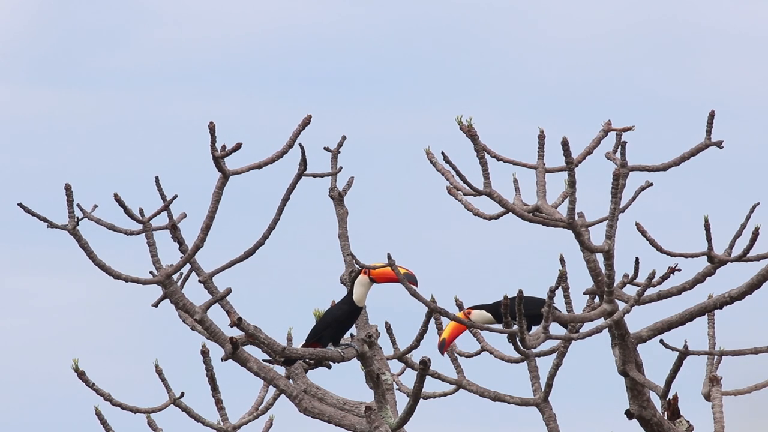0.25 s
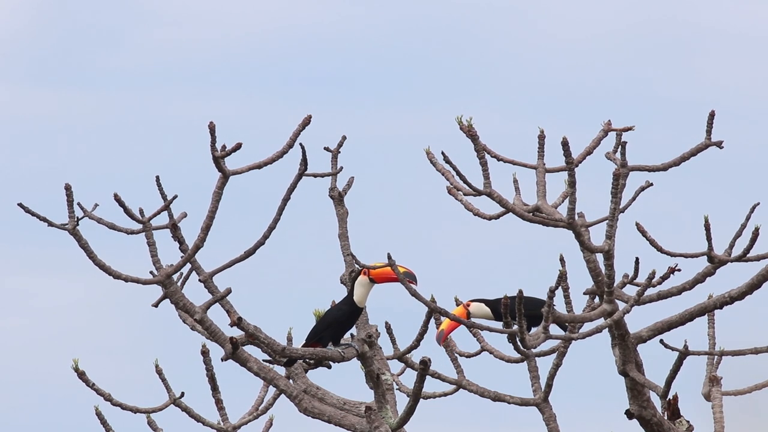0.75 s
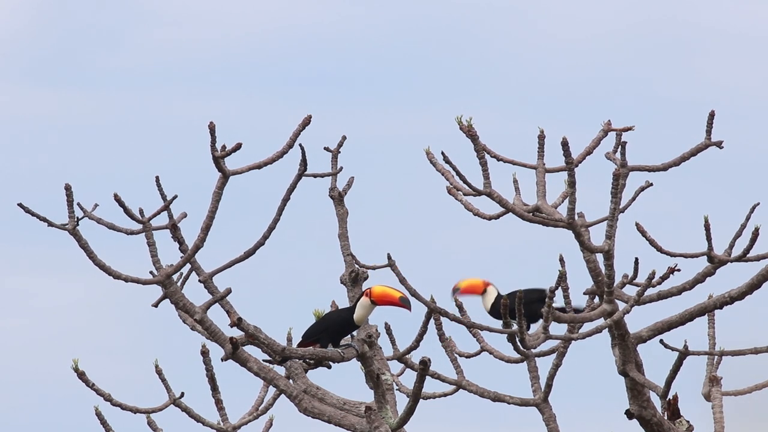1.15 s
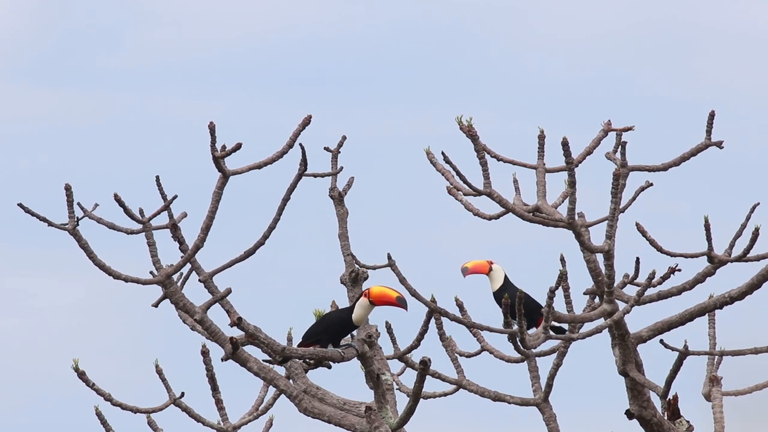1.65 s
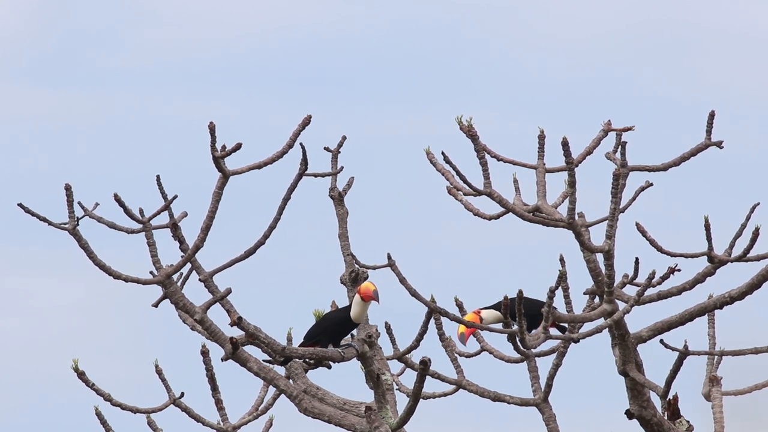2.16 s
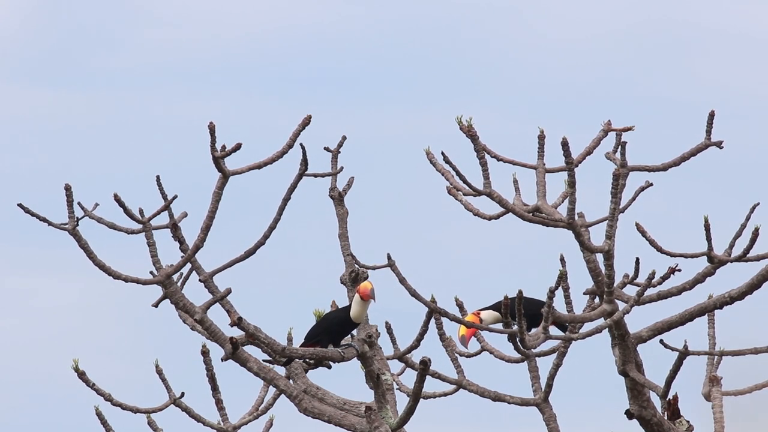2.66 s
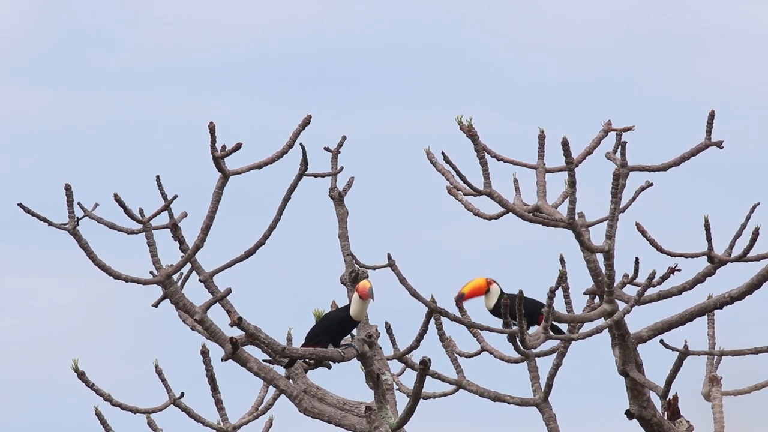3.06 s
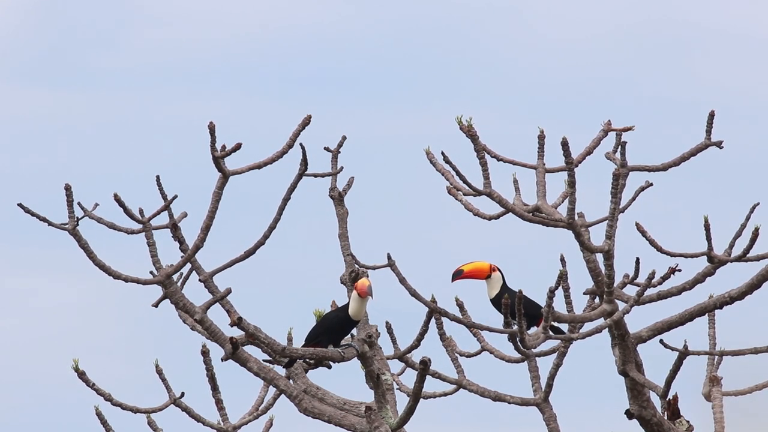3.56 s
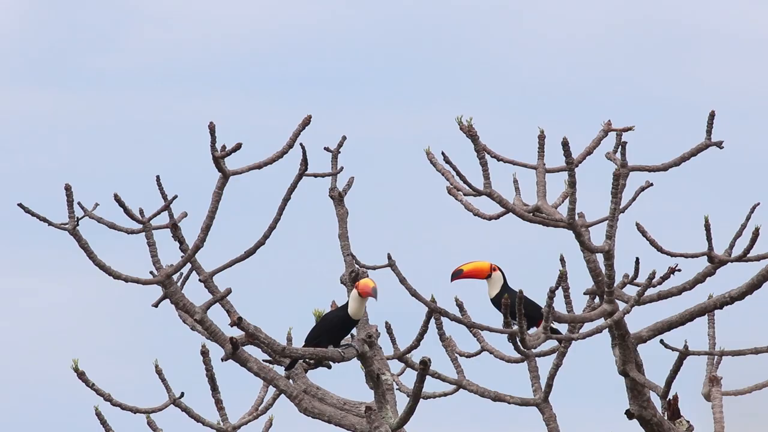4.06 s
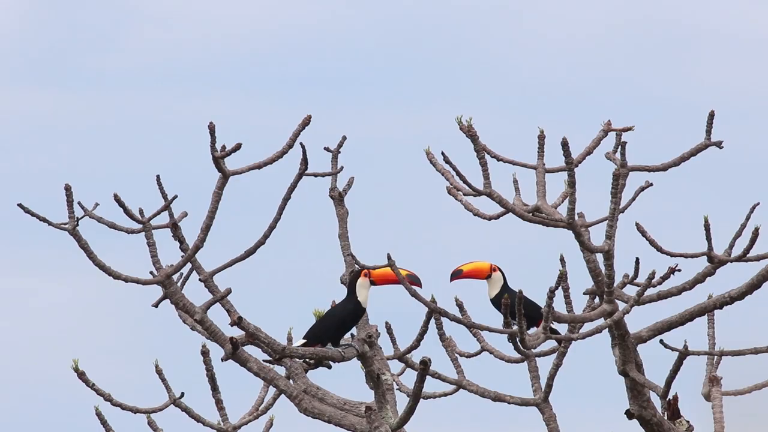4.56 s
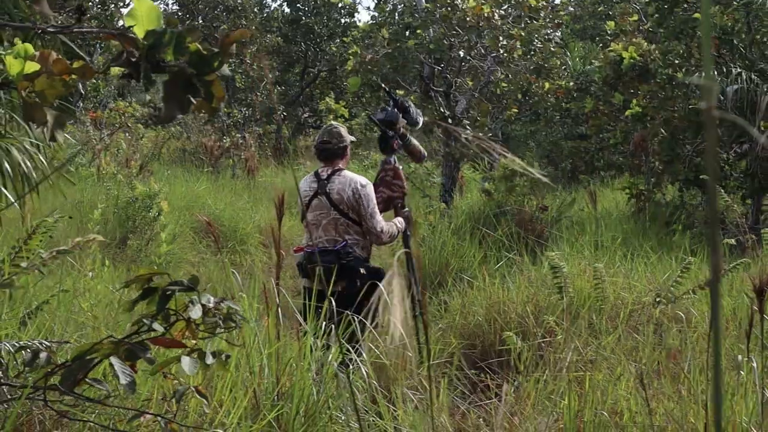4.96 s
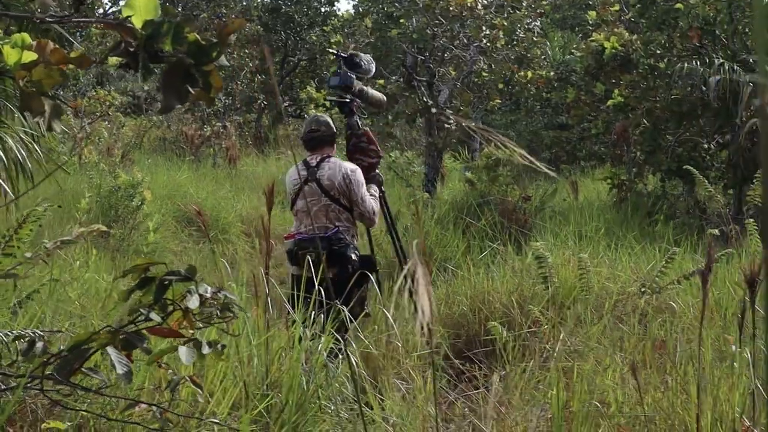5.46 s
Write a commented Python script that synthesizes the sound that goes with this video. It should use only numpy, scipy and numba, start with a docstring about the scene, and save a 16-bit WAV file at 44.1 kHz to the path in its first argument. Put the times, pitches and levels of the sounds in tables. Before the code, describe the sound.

Toucans give seven short, hoarse croaks in open grassland, each a quick rattle of hollow knocks, some following in close pairs. Behind them run a steady high insect whine, crickets and a cicada buzzing in short, uneven phrases. Faint small birds whistle and far frogs rasp over a soft hiss of air. The toucans and cicada sit mostly on the left, while the right is quieter.

```python
"""Toucans croak in a bare tree over open grassland: each croak is a slowing train of syrinx pulses that
excites the resonances of windpipe and throat pouch. A directional microphone (left) aimed at them also
receives a cicada, whose membrane clicks ring its body, a katydid's wing rasp, a cricket, an insect whine,
distant birds and dry ticks. A quieter open microphone (right) receives crickets, far frogs and a little
of the toucans and katydid. Beneath lie a steady hiss of air and distant cicadas, and gusts of wind."""
import sys
import numpy as np
from scipy import signal
from scipy.fft import rfft, irfft
from scipy.io import wavfile
from scipy.ndimage import uniform_filter1d
from numba import njit

SR = 44100
rng = np.random.default_rng(int(sys.argv[2]) if len(sys.argv) > 2 else 0)


def wav_record(signal):
    """Record a signal, one row per channel, as 16-bit PCM in the file named by sys.argv[1]."""
    frames = np.transpose(np.atleast_2d(signal))
    bounded = np.clip(frames, -1, 1)
    # unit amplitude maps onto the largest positive 16-bit level
    quanta = np.round(bounded * 32767).astype(np.int16)
    wavfile.write(sys.argv[1], SR, quanta)


N = 252252

# Levels in the tables are relative: gains apply afterwards.
# Steady background hiss of air and distant cicadas: (frequency [Hz], spectral density [dB re 1/Hz])
BACKGROUND_LEFT = [(40, -75), (70, -68.5), (100, -75), (250, -78), (600, -82), (1500, -84), (2500, -84),
                   (3300, -89.5), (4000, -85.5), (4600, -76.5), (5300, -90.5), (6000, -78), (7900, -86),
                   (8300, -93), (11000, -94.5), (13200, -90), (15800, -92)]
BACKGROUND_RIGHT = [(40, -71), (120, -81), (300, -85.5), (1000, -91), (2500, -89.5), (3600, -94),
                    (5500, -94), (6200, -92), (7000, -94), (7900, -95), (8200, -99), (11000, -94.5),
                    (15800, -94.5)]
# Gust envelope: (time [s], level [dB], left minus right [dB])
GUSTS = [(0.0, -47, -2), (0.29, -48, -13), (0.46, -47, 6), (0.65, -44.5, -10), (1.31, -47.5, -5),
         (1.37, -50.5, -19), (1.69, -38.5, 9), (1.86, -37.5, -11), (2.4, -37.5, -11), (2.47, -28, 8.0),
         (2.56, -31, -11), (2.66, -37, -5.0), (4.37, -41, -6), (4.57, -48, -13), (4.68, -54, -4),
         (5.43, -37, -11.5), (5.48, -47, 3), (5.72, -40.5, -9)]
# Frog calls: (onset [s], duration [s], level [dB])
FROG_CALLS = [(-.04, 0.18, -46), (.48, 0.18, -47), (0.959, 0.17, -42), (1.508, 0.22, -45.5),
              (1.979, 0.28, -48), (2.411, 0.17, -47), (2.96, 0.23, -52), (3.452, 0.23, -47),
              (3.851, 0.185, -50), (4.299, 0.15, -42.5), (4.998, 0.17, -44.5), (5.502, 0.34, -49.5)]
# Bands of a frog call: (start frequency [Hz], end frequency [Hz], level [dB])
FROG_SWEEPS = [(2480, 2100, 0), (2800, 2450, -4), (3250, 2950, -6)]
# Cicada phrases: (onset [s], duration [s], start level [dB], end level [dB], start brightness [dB],
# end brightness [dB], nominal body resonance [Hz])
CICADA_PHRASES = [(0, .38, -55, -49, -12, -11, 4520), (.4, 0.16, -53, -46, -12, 2, 4540),
                  (.55, 0.069, -46, -49, 1.1, -3, 4520), (.63, .12, -45, -42, 4, 1.1, 4550),
                  (.77, 0.13, -49, -43.5, -12, -16, 4460), (.972, .26, -45, -43, -17, -11, 4430),
                  (1.297, .05, -45, -43, -11, -11, 4470), (1.352, .08, -37, -40, -1.2, -7, 4450),
                  (1.44, .265, -35.5, -38, -2.5, -11, 4630), (1.77, 0.086, -50, -45, -12, -12, 4560),
                  (1.87, .28, -42.5, -39, -.5, -12, 4610), (2.2, .19, -47, -42, -10, -10, 4490),
                  (2.45, .18, -48.5, -41, -12, -7.5, 4470), (2.7, 0.15, -48.5, -38, -16, -5, 4420),
                  (2.92, .14, -44.5, -36.5, -15, -2, 4450), (3.12, 0.12, -44, -35.5, -15, -2, 4460),
                  (3.31, 0.096, -39, -33, -21, -4, 4500), (3.469, 0.083, -34.5, -35.5, -10, 0, 4540),
                  (3.6, .283, -34, -30, -1, -2, 4455), (3.905, .045, -48.5, -44.5, -12, -10, 4620),
                  (4., .66, -53, -50, -8, -8, 4500), (4.87, 0.065, -56, -52, -6, -10, 4600),
                  (5.0, .07, -55, -52, -8, -8, 4530), (5.085, .09, -41, -55, -10, -4, 4600),
                  (5.22, 0.13, -55, -47, -12, -14, 4580), (5.36, .12, -50, -48, -12, -12, 4380),
                  (5.6, .1, -48, -50, -10, -6, 4470)]
# Katydid envelope: (time [s], level [dB])
KATYDID_LEVELS = [(0, -51), (2, -41), (3.5, -41.5), (5.72, -37)]
# Choruses of whining insects and of meadow crickets: (frequency [Hz], spread [Hz], level [dB])
WHINE_CHORUS = [(6567, 59, 8.5), (6810, 59, 5.5), (6810, 51, -19), (6360, 74, 0.5), (7000, 79, -5),
                (7290, 69, -7), (7550, 80, -2)]
CRICKET_CHORUS = [(7350, 60, -3), (7500, 70, 0), (7700, 70, -2)]
# Pulse trains: (onset [s], knocks [count], then the interval at 0, 25, 70 and 100 % of the croak [ms])
CROAK_TIMING = [(.0128, 6, 21.6, 22.8, 23.3, 26.8), (1.0244, 9, 16.7, 21.9, 22.8, 25.9),
                (1.3263, 10, 14.6, 20.7, 23.2, 28.3), (2.1228, 9, 18.1, 21.7, 22.6, 27.2),
                (3.265, 9, 19.9, 21.1, 22.9, 26.7), (3.4792, 9, 14.0, 20.5, 23.3, 28.2),
                (4.3563, 10, 16.5, 20.6, 23.2, 26.4)]
# First windpipe resonance, one curve per croak: (time [s], level [dB])
MAIN_LEVELS = [
    [(.013, -21), (.057, -26), (.079, -17.5), (.104, -20), (.13, -13.5)],
    [(1.024, -22), (1.04, -19), (1.105, -15), (1.15, -26), (1.175, -13.5), (1.2, -13)],
    [(1.326, -15), (1.38, -14.5), (1.4, -20), (1.445, -20), (1.469, -12), (1.495, -10.5), (1.524, -20.5)],
    [(2.123, -23), (2.16, -17), (2.25, -18), (2.275, -13.5), (2.302, -13.5)],
    [(3.265, -20.5), (3.305, -16), (3.37, -16), (3.394, -16.5), (3.418, -12), (3.445, -12.5)],
    [(3.479, -21), (3.492, -17.5), (3.553, -12), (3.625, -9.5), (3.653, -14.5)],
    [(4.356, -29), (4.39, -16.5), (4.503, -17.5), (4.527, -14), (4.554, -12)],
]
# Windpipe, per croak: (four nominal resonances [Hz], third over second [dB], fourth over second [dB])
PIPE_MODES = [(1393, 2235, 2786, 3670, -3, -14), (1323, 2065, 2750, 3900, 1, -6),
              (1440, 2536, 3015, 4700, 0.5, -7.5), (1331, 2160, 2900, 3470, -0.5, -13),
              (1332, 2200, 2826, 4800, -3, -21), (1432, 2320, 2997, 4300, 6.5, -3),
              (1360, 2217, 2845, 4500, -4, -20)]
# Pulse response of each windpipe resonance: (lag [ms], rise [ms], nominal decay [ms], fall rate [1/s],
# frequency scatter [fraction], level scatter [dB])
PIPE_RESPONSES = [(0, 1.5, 1.6, 18, .015, .7), (-1.8, 1.3, 1.7, 20, .03, 2), (0, 1.1, 1.2, 12, .025, 2),
                  (-.5, 1, 1.3, 12, .04, 3)]
# Throat pouch resonances: (frequency [Hz], level [dB], lag [ms], rise [ms], decay [ms])
POUCH_MODES = [(356, -10, 8.24, 2.433, 3.3), (430, -7, 6.97, 2.44, 3.05), (526.5, -9, 5.9, 2.153, 4.6),
               (650, -4.5, 5.07, 2.09, 1.53), (725, -10.5, 3.14, 1.746, 2.4)]
# Turbulence in the open beak: (frequency [Hz], level over the second resonance [dB])
RASP_SPECTRUM = [(900, -18), (1800, -9), (2600, -10), (3500, -12), (4400, -13), (5500, -20), (6500, -28),
                 (9500, -36)]
# Balance of each croak: (upper resonances [dB], pouch [dB], starting point on CROAK_SWELL [fraction],
# accent of the last knock [dB], rasp [dB])
CROAK_BALANCE = [(-17.5, -32, 0.35, 0.5, -4.5), (-23.5, -33.5, 0.038, 2, -1.1), (-18.5, -29, .04, -5, 3),
                 (-25, -32, 0.0075, -.1, -.1), (-22, -31.5, 0.036, 1.5, -.1), (-22, -29.5, 0.038, -4, 1.1),
                 (-18.5, -32.5, 0, -2.5, -5)]
# Envelope common to all croaks: (position [fraction], upper resonances [dB], pouch [dB])
CROAK_SWELL = [(0, -16, -2.5), (.15, -8, -1.2), (.55, -.2, -.2), (.85, 0, 0.8), (1, -5.5, -5)]
# Reflections from ground and trunk: (delay [ms], level [dB])
REFLECTIONS = [(8, -21.5), (14, -35)]
# Small birds' notes: (onset [s], duration [s], start frequency [Hz], turning frequency [Hz],
# turning point [fraction], end frequency [Hz], start level [dB], end level [dB])
WHISTLE_NOTES = [(0.169, .055, 3450, 3380, 0.22, 2520, -46.5, -55),
                 (0.222, .1, 2550, 2950, 0.32, 2310, -51.5, -57),
                 (0.521, 0.028, 5290, 4440, .55, 4430, -41, -40.5),
                 (.845, .15, 2720, 2640, .45, 2700, -64, -66), (1.57, .08, 1950, 1830, .45, 1810, -61, -62),
                 (2.199, 0.099, 4500, 5380, 0.58, 4560, -47, -54),
                 (3.84, .2, 3050, 2900, .4, 2580, -67, -64),
                 (4.737, 0.053, 2910, 2480, 0.56, 2350, -53, -56.5),
                 (4.795, .093, 4500, 3350, 0.296, 4020, -56, -51),
                 (4.885, .02, 3680, 3630, .25, 2540, -53, -53),
                 (4.928, .115, 1950, 2310, 0.53, 2110, -60, -60),
                 (5.11, .05, 2380, 2320, .3, 2390, -62, -68), (5.528, .07, 1500, 2055, .45, 1956, -60, -50),
                 (5.595, 0.037, 1940, 2080, .55, 2300, -53, -55),
                 (5.548, 0.023, 3770, 3780, .45, 3870, -52, -51)]
# Dove coos: (onset [s], duration [s], frequency [Hz], level [dB])
COO_NOTES = [(0.199, 0.17, 445, -67), (2.604, 0.097, 339, -63), (2.76, .29, 335, -63.5),
             (3.762, 0.19, 345, -62), (4.599, 0.28, 356, -62), (5.45, 0.25, 342.3, -63)]
# Short dry ticks, one a soft knock just before a croak: (time [s], treble level [dB], body level [dB])
DRY_TICKS = [(0.526, -31, -34.5), (.967, -48, -38.5), (1.003, -50, -36), (3.1847, -31, -49),
             (3.4033, -21, -38)]
# Hoarse squawks: (onset [s], duration [s], lowest resonance at start, middle and end [Hz],
# level at start, middle and end [dB])
HOARSE_CALLS = [(1.68, .21, 1110, 1226, 1130, -55.5, -55, -54),
                (2.42, .46, 1202, 1016, 1094, -47.5, -53.5, -52.5)]
# Their resonances: (frequency over the lowest [ratio], level [dB])
HOARSE_MODES = [(1, 2.5), (1.25, -1.5), (1.5, 1.5), (1.85, -3.5), (2.3, -5), (2.8, -1.5), (3.3, -6.5)]
# Clean opening of a squawk: (time [s], fundamental [Hz], level [dB])
SQUAWK_CONTOUR = [(2.29, 613, -58), (2.304, 614, -52.5), (2.366, 665, -49), (2.38, 651, -45.5),
                  (2.43, 516, -57.5)]
# Its spectrum: (harmonic [number], level [dB])
SQUAWK_HARMONICS = [(1, -14.5), (2, -2), (3, 4), (4, -7), (5, -8.5), (6, -8)]
# Far trills: (onset [s], end [s], note rate [1/s], frequency [Hz], level [dB])
TRILL_RUNS = [(3.099, 3.22, 45, 2500, -54), (4.095, 4.25, 23, 2530, -50), (5.241, 5.308, 45, 2680, -51.5)]

AIMED_DB, SPILL_DB = 7.5, -35.5  # gain of the aimed microphone; toucans at the right re the left
BUZZ_ATTACK_S, BUZZ_RELEASE_S, BUZZ_EDGE_DB = .01, .012, -22
BUZZ_ACCENT_DB, BUZZ_ACCENT_S, BUZZ_SAG_PER_DB = 5.5, .015, .0035


def amp(db):
    """Amplitude ratio of a level in dB."""
    return 10 ** (np.asarray(db, float) / 20)


def read(table, t):
    """Linear interpolation of a table's columns at positions t along its first."""
    s, *columns = np.transpose(table)
    return [np.interp(t, s, c) for c in columns]


def bursts(s, hz, db, rise_ms, decay_ms, glide=0., spread=0., scatter_db=0., phase_scatter=9.92):
    """Parameters of damped oscillations peaking at times s, with Gaussian pitch, level and phase."""
    pitch, level, phase = rng.standard_normal((len(s), 3)).T
    columns = (s, hz * (1 + spread * pitch), amp(db + scatter_db * level),
               rise_ms / 1000, decay_ms / 1000, glide, phase_scatter * phase)
    return np.column_stack(np.broadcast_arrays(*columns))


@njit
def ring(rows, n, sr):
    """Damped oscillations: each has a Gaussian rise, a near-exponential decay and a downward glide."""
    out = np.zeros(n)
    for s, hz, size, rise, decay, glide, phase in rows:
        peak = int(s * sr)
        for i in range(max(peak - int(3 * rise * sr), 0), min(peak + int(6 * decay * sr), n)):
            t = i / sr - s
            phase += 2 * np.pi * hz * np.exp(-glide * min(t, decay)) / sr
            envelope = np.exp(-.5 * (t / rise) ** 2) if t < 0 else 1 / np.cosh(t / decay)
            out[i] += size * np.sin(phase) * envelope
    return out


def play(rows):
    """Linear superposition of groups of bursts."""
    return ring(np.vstack(rows), N, float(SR))


def walk(rate):
    """Low-pass random modulation: values held 1 / rate s and smoothed twice, with spread near 1."""
    hold = int(SR / rate)
    steps = np.repeat(rng.standard_normal(N // hold + 1), hold)
    return 1.3 * uniform_filter1d(uniform_filter1d(steps, hold), hold)[:N]


def scatter(sound, tail_db, t60_s, echoes=()):
    """Scattering by trees: convolution adds an exponentially decaying tail and any discrete echoes."""
    t = np.arange(SR // 4) / SR
    response = rng.standard_normal(len(t)) * amp(-60 * t / t60_s) * np.minimum(t / .0039, 1)
    response *= amp(tail_db) / np.linalg.norm(response)
    response[0] = 1  # direct path
    for ms, db in echoes:
        response[int(ms * SR / 1000)] += amp(db)
    return signal.fftconvolve(sound, response)[:N]


def background(spectrum):
    """Spectrally shaped noise: its octave bands swell slightly together and flicker independently."""
    hz = np.maximum(np.fft.rfftfreq(N, 1 / SR), 1)
    knots_hz, db = np.transpose(spectrum)
    density = amp(np.interp(np.log(hz), np.log(knots_hz), db))
    noise = rfft(rng.standard_normal(N)) * density * np.sqrt(SR / 2)
    octave, swell = np.log2(hz / 32), walk(.71)
    bands = (irfft(noise * np.clip(1 - abs(octave - k), 0, 1), N) for k in range(10))
    return sum(amp(.5 * swell + 1.2 * walk(9)) * band for band in bands)


def wind(buffet_db=1.5, buffet_rate=12):
    """Turbulent pressure: gusts buffet each microphone with uncorrelated noise in the deepest bass."""
    db, pan = read(GUSTS, np.arange(N) / SR)
    bass = signal.butter(2, [10, 26], "band", fs=SR, output="sos")
    rumble = signal.sosfilt(bass, rng.standard_normal((2, N)))
    # flatten the chance swells, so that the gusts alone set the level
    rumble /= np.sqrt(uniform_filter1d(rumble ** 2, SR // 8, axis=1) + 1e-12)
    buffets = buffet_db * np.array([walk(buffet_rate), walk(buffet_rate)])
    return rumble * amp(db + buffets + np.array([pan, -pan]) / 2)


def frogs(rate=110):
    """Pulsed excitation: each call rasps in three bands that sink as it goes on."""
    rows = []
    for start, length, db in FROG_CALLS:
        progress = np.arange(0, 1, 1 / (rate * length))
        s = start + progress * length
        swell_db = 10 * np.log10(np.sin(np.pi * progress ** .52) + .011)
        for start_hz, end_hz, band_db in FROG_SWEEPS:
            hz = start_hz + (end_hz - start_hz) * progress ** 1.4
            rows.append(bursts(s, hz, db + band_db + swell_db, .99, 4.4, spread=.0414, scatter_db=3.2))
    return play(rows)


def cicada(rate=121.5):
    """Periodic excitation of a resonator: even membrane clicks ring the body, so the buzz has a pitch."""
    rows = []
    for start, length, start_db, end_db, start_bright, end_bright, body_hz in CICADA_PHRASES:
        t = np.arange(0, length + BUZZ_RELEASE_S, 1 / rate)
        s = start + t + .00004 * np.cumsum(rng.standard_normal(len(t)))
        progress, swell_db = np.minimum(t / length, 1), end_db - start_db
        edge = np.clip(np.maximum(1 - t / BUZZ_ATTACK_S, (t - length) / BUZZ_RELEASE_S), 0, 1)
        accent_db = BUZZ_ACCENT_DB * np.exp(-t / BUZZ_ACCENT_S)
        db = start_db + progress ** 1.6 * swell_db + BUZZ_EDGE_DB * edge + accent_db
        # the resonance sags and recovers, the more so the more the phrase swells
        sag = BUZZ_SAG_PER_DB * np.clip(swell_db, 0, 12) * (np.sin(np.pi * progress ** .6) - .6)
        hz = body_hz * (1 - sag)
        bright_db = start_bright + progress * (end_bright - start_bright)
        # two brighter bands lead the body; a broad octave above it swells less
        rows += [bursts(s, hz, db + 4, 1.15, 1.2, 24., .008, 1.7, .84),
                 bursts(s - .001, 1.09 * hz, db + .4 * bright_db - .6, 1., 1.7, 15., .011, 2.5, .64),
                 bursts(s - .0015, 5410, db + bright_db, .81, .77, 8., .02, 1.58)]
        rows += [bursts(s, k * hz, .5 * db - 38.6, .93, 2.4, 0., .015, 1.6) for k in (1.95, 2.06, 2.18)]
    return scatter(play(rows), tail_db=-8.5, t60_s=.081)


def katydid(clicks=24):
    """Stridulation: wing strokes, about 21 a second and slowing, each a cluster of very high clicks."""
    stroke = np.arange(-45, 76)
    s = np.repeat(2.1205 + .047308 * stroke + 1.311e-5 * stroke ** 2, clicks)
    s += rng.exponential(.002, len(s)) - .002
    hz = rng.uniform(10500, 16000, len(s))
    db = read(KATYDID_LEVELS, s)[0] - 3 - 2.25 * (16000 - hz) / 1000
    return play([bursts(s, hz, db, .36, .38, scatter_db=2.6)])


def cricket(hz, db, period_s=.06542):
    """Resonant stridulation: a steady, nearly pure chirp, formed of two overlapping bursts."""
    s = .0056 + period_s * np.arange(88)
    return play([bursts(s + lag, hz, db, 5.6, 5.2, .57, .0015, .27) for lag in (-.004, .004)])


def chorus(bands, db, rate, ring_ms=2.5):
    """Incoherent summation: many insects' chirps overlap into narrow bands that throb slightly."""
    rows = []
    for hz, spread_hz, band_db in bands:
        s = np.cumsum(rng.uniform(.5, 1.5, int(1.1 * rate * N / SR))) / rate
        throb_db = .47 * walk(24.94)[np.minimum(s * SR, N - 1).astype(int)]
        rows.append(bursts(s, hz, db + band_db + throb_db, ring_ms, ring_ms, 0., spread_hz / hz, 3.08))
    return play(rows)


def beak_rasp(s, db, grains=40):
    """Turbulence in the open beak: a spray of grains starts just before each knock and thins out."""
    delay = rng.exponential(.0043, (len(s), grains))
    times = s[:, None] + delay - .0025
    hz = np.tile(np.geomspace(RASP_SPECTRUM[0][0], RASP_SPECTRUM[-1][0], grains), (len(s), 1))
    grain_db = db[:, None] + read(RASP_SPECTRUM, hz)[0] - 300 * delay
    return [bursts(times.ravel(), hz.ravel(), grain_db.ravel(), .5, .7, spread=.05, scatter_db=3.)]


def windpipe(s, pipe, main_db, upper_db):
    """Air-column resonance: an open beak brightens the knock, lifts its pitch and damps its ring."""
    *modes_hz, third_db, fourth_db = pipe
    levels = main_db, upper_db, upper_db + third_db, upper_db + fourth_db
    closure = np.clip((main_db - upper_db) / 14, 0, 1)
    tuning, sustain = 1.055 - .095 * closure, .56 + .42 * closure ** 2
    return [bursts(s + lag / 1000, hz * tuning, db, rise, decay * sustain, *shape)
            for hz, db, (lag, rise, decay, *shape) in zip(modes_hz, levels, PIPE_RESPONSES)]


def throat_pouch(s, pouch_db):
    """Cavity resonance: the pouch answers each knock a few milliseconds late, at low frequencies."""
    rows = []
    for hz, db, lag, rise, decay in POUCH_MODES:
        delay = (lag + .5 * rng.standard_normal(len(s))) / 1000
        rows.append(bursts(s + delay, hz, pouch_db + db, rise, decay, 5., .04, 1.5))
    return rows


def toucans():
    """Source and filter: slowing syrinx knocks drive windpipe, pouch and rasp; ground and trees echo."""
    rows = []
    for timing, pipe, curve, balance in zip(CROAK_TIMING, PIPE_MODES, MAIN_LEVELS, CROAK_BALANCE):
        start, knocks, *gaps_ms = timing
        upper_db, pouch_db, swell_start, last_db, rasp_db = balance
        gaps = np.interp(np.linspace(0, 1, knocks - 1), [0, .25, .7, 1], gaps_ms) / 1000
        s = start + np.r_[0, np.cumsum(gaps)]
        upper_swell, pouch_swell = read(CROAK_SWELL, np.linspace(swell_start, 1, knocks))
        accent_db = last_db * (s == s[-1])
        upper_db = upper_db + upper_swell + accent_db
        rows += windpipe(s, pipe, read(curve, s)[0], upper_db)
        rows += throat_pouch(s, pouch_db + pouch_swell + accent_db)
        rows += beak_rasp(s, upper_db + rasp_db)
    return scatter(play(rows), tail_db=-10.5, t60_s=.12, echoes=REFLECTIONS)


def tone(contour, waver, flutter, harmonics=((1, 0),)):
    """Frequency and amplitude modulation of a soft-edged note along a (time, pitch, level) contour."""
    i = np.arange(int(contour[0][0] * SR), min(int(contour[-1][0] * SR), N))
    gate = signal.windows.tukey(len(i), min(1, 700 / len(i)))
    hz, db = read(contour, i / SR)
    hz = uniform_filter1d(hz, size=500) * (1 + .0036 * waver[i])
    phase = 2 * np.pi * np.cumsum(hz) / SR
    wave = sum(amp(level) * np.sin(k * phase) for k, level in harmonics)
    out = np.zeros(N)
    out[i] = np.sqrt(2) * gate * amp(db + 2.5 * flutter[i]) * wave
    return out


def whistles(waver, flutter):
    """Frequency glides: each small bird's note is a sinusoid that bends at one turning point."""
    out = np.zeros(N)
    for s, length, start_hz, turn_hz, turn, end_hz, db, end_db in WHISTLE_NOTES:
        bend = (s + turn * length, turn_hz, db + turn * (end_db - db))
        out += tone([(s, start_hz, db), bend, (s + length, end_hz, end_db)], waver, flutter)
    return out


def coos(waver, flutter):
    """Nearly simple harmonic motion: each dove coo is a low, slightly wavering sinusoid."""
    return sum(tone([(s, hz, db), (s + length, hz, db)], waver, flutter)
               for s, length, hz, db in COO_NOTES)


def ticks(modes=24):
    """Brief transients have broad spectra: each dry tick is a cluster of heavily damped oscillations."""
    rows, hz = [], np.geomspace(900, 15500, modes)
    for s, treble_db, body_db in DRY_TICKS:
        times = s + .0025 + .002 * rng.standard_normal(modes)
        db = np.where(hz > 6000, treble_db - 15.5, body_db - 14)
        rows.append(bursts(times, hz, db, .28, .48, spread=.02, scatter_db=3.5))
    return play(rows)


def hoarse_squawks(flutter, period_s=.012):
    """Jitter and shimmer: pulses uneven in time and level ring drifting resonances and sound hoarse."""
    rows, drift = [], walk(14)
    for start, length, *knots in HOARSE_CALLS:
        contour = np.column_stack([start + length * np.array([0, .5, 1]), knots[:3], knots[3:]])
        for ratio, mode_db in HOARSE_MODES:
            s = np.arange(start, start + length, period_s)
            s += .001294 * rng.standard_normal(len(s))
            i = (s * SR).astype(int)
            hz, db = read(contour, s)
            hz *= ratio * (1 + .045 * drift[i])
            db += mode_db + 2.2 * flutter[i]
            rows.append(bursts(s, hz, db, .99, 2.1, spread=.055, scatter_db=1.8))
    return play(rows)


def clean_squawk(waver, flutter):
    """Harmonic series: one squawk opens with periodic vibration, heard as six partials."""
    return tone(SQUAWK_CONTOUR, waver, flutter, SQUAWK_HARMONICS)


def trills():
    """Pulse trains of tone bursts: faint, quick runs of short falling notes."""
    return play([bursts(np.arange(start, end, 1 / rate), hz, db, 3., 3., 10., .035, 2.)
                 for start, end, rate, hz, db in TRILL_RUNS])


def scene():
    """Directivity: the aimed microphone favours the tree and what lies behind, the open one the meadow."""
    croaks = toucans()
    whine = chorus(WHINE_CHORUS, db=-50, rate=130)
    waver, flutter = walk(60), walk(40)
    calls = whistles(waver, flutter) + coos(waver, flutter)
    calls += hoarse_squawks(flutter) + clean_squawk(waver, flutter)
    far_birds = amp(1.5) * scatter(calls, tail_db=-6, t60_s=.15)
    aimed = amp(AIMED_DB) * (croaks + far_birds + trills() + cicada() + whine + ticks())
    aimed += cricket(hz=7765, db=-36.5) + katydid()
    meadow = chorus(CRICKET_CHORUS, db=-48, rate=110) + cricket(hz=7800, db=-48.5) + frogs()
    meadow += amp(AIMED_DB + SPILL_DB) * croaks + amp(-8.5) * katydid()
    return np.array([aimed + background(BACKGROUND_LEFT), meadow + background(BACKGROUND_RIGHT)]) + wind()


def record(dry, drive=.75, cutoff_hz=15800):
    """Soft saturation rounds the loudest knocks a little; a steep low-pass filter limits the band."""
    lowpass = signal.ellip(14, .3, 70, cutoff_hz, fs=SR, output="sos")
    return signal.sosfilt(lowpass, np.tanh(drive * dry) / drive)


dry = scene()
out = record(dry)
wav_record(out)
```